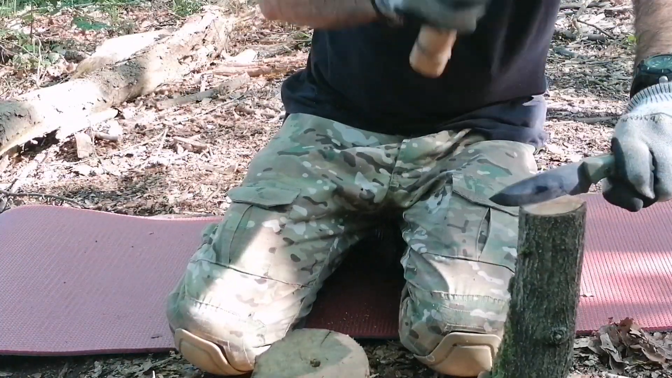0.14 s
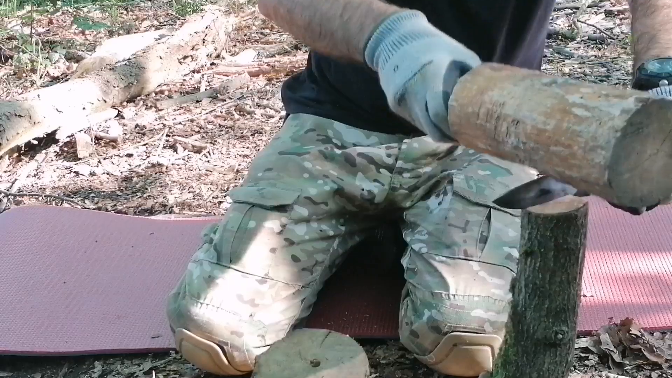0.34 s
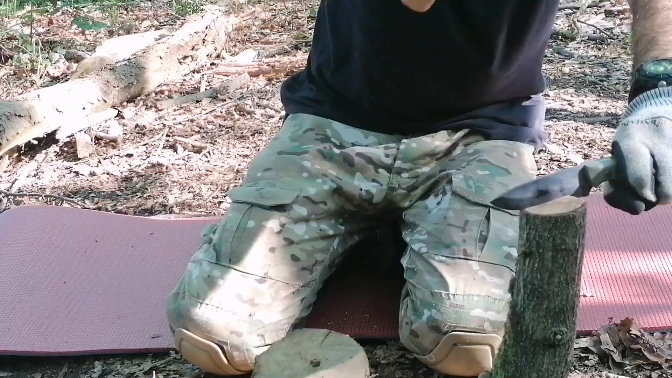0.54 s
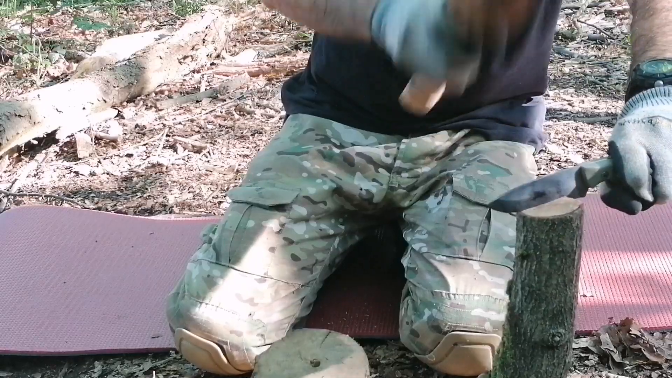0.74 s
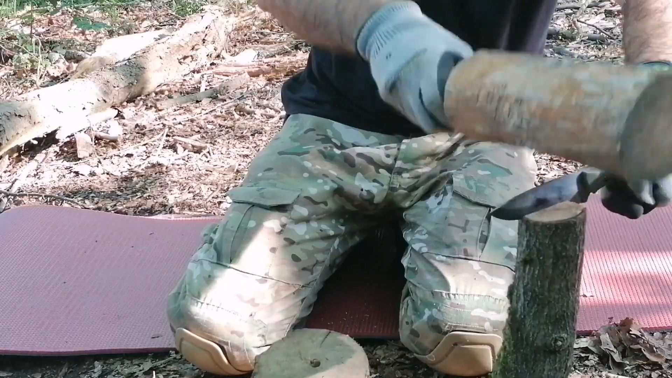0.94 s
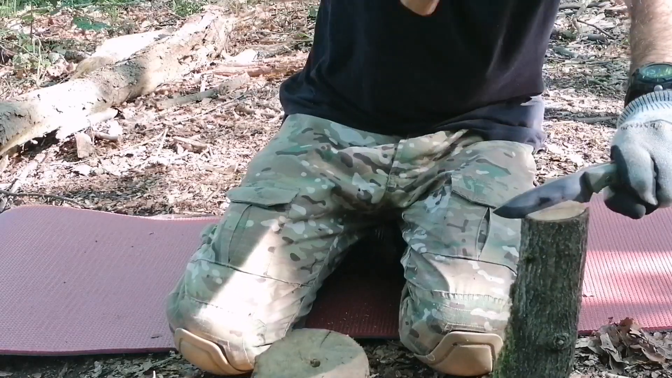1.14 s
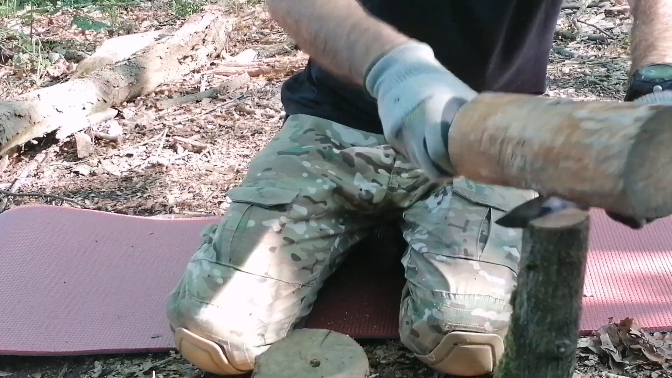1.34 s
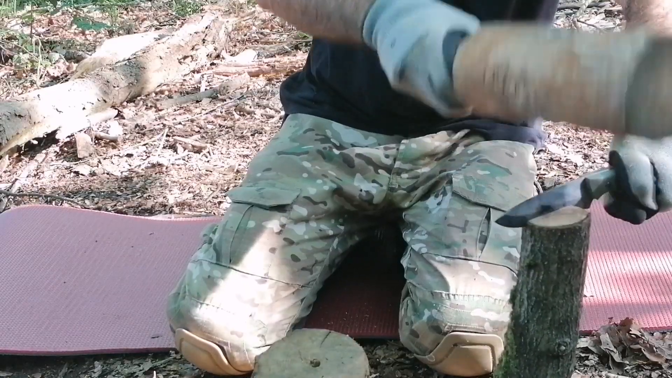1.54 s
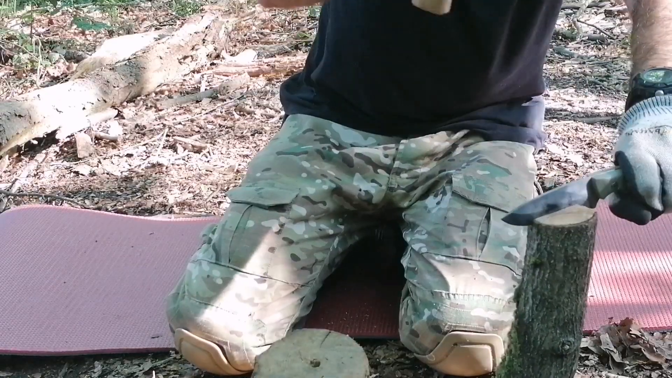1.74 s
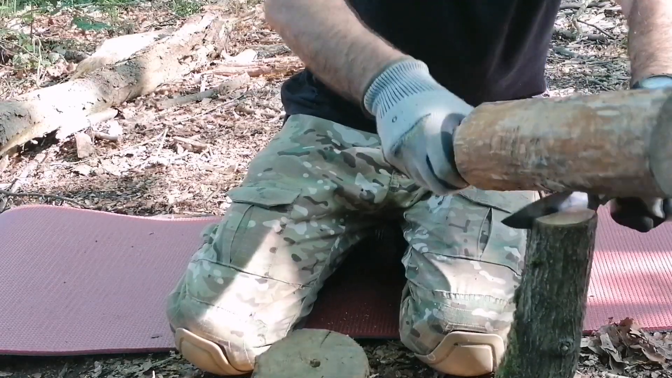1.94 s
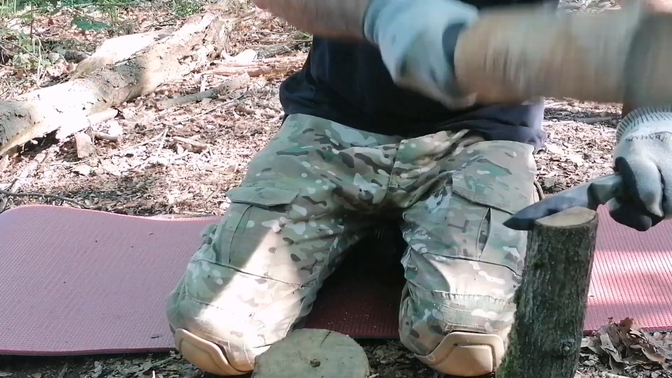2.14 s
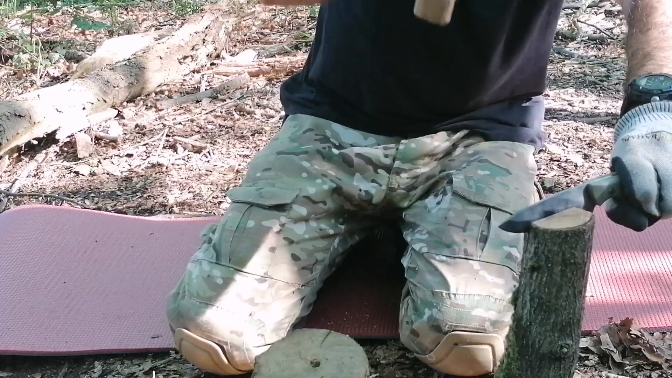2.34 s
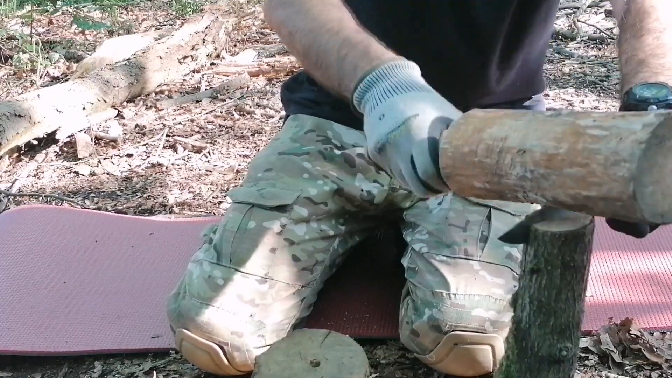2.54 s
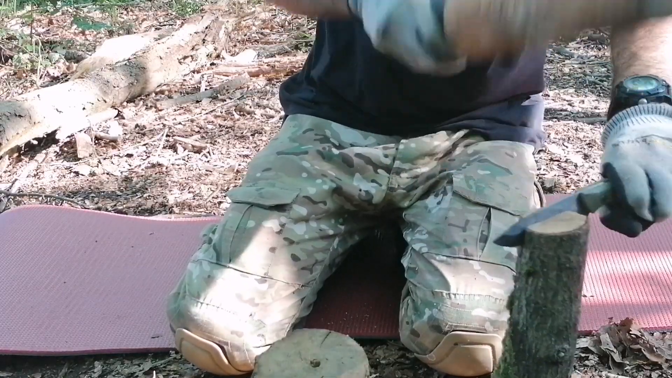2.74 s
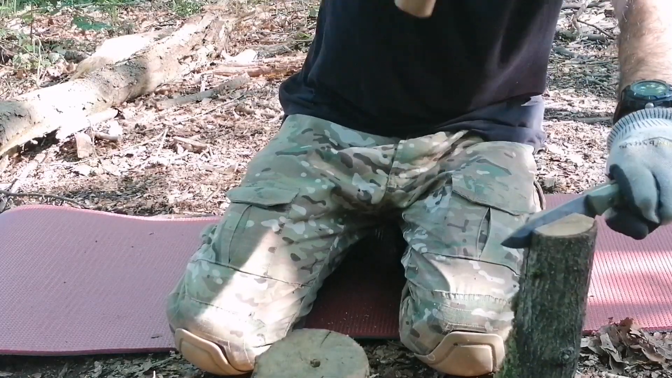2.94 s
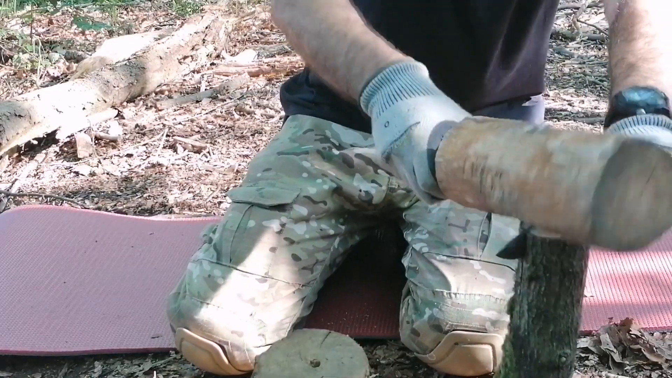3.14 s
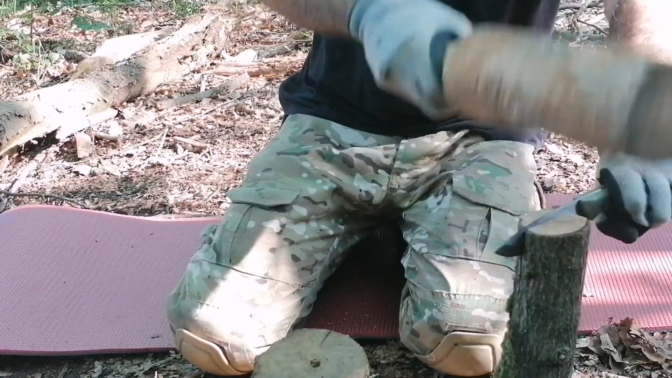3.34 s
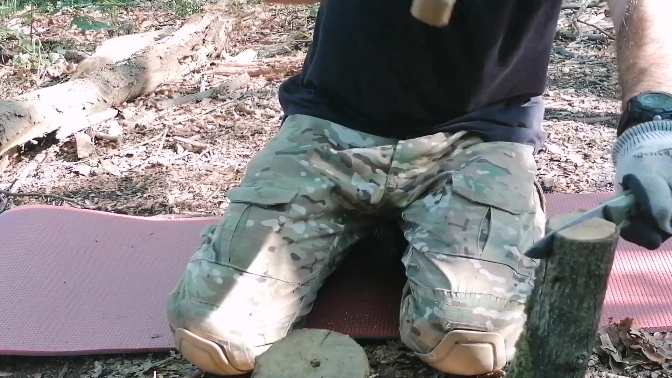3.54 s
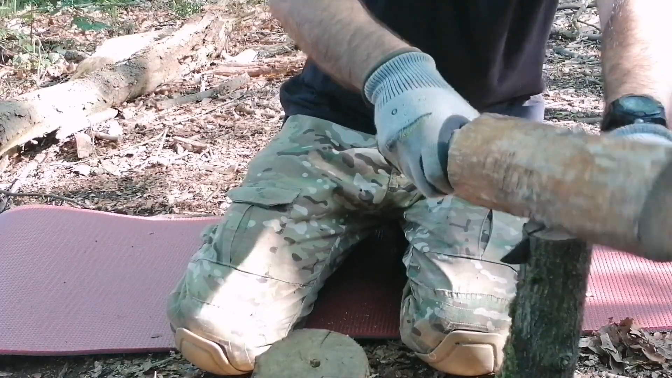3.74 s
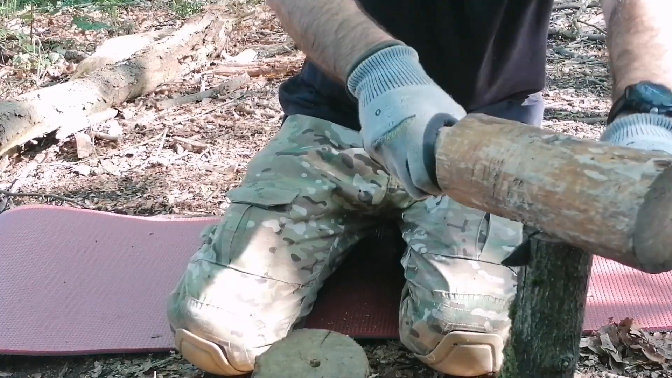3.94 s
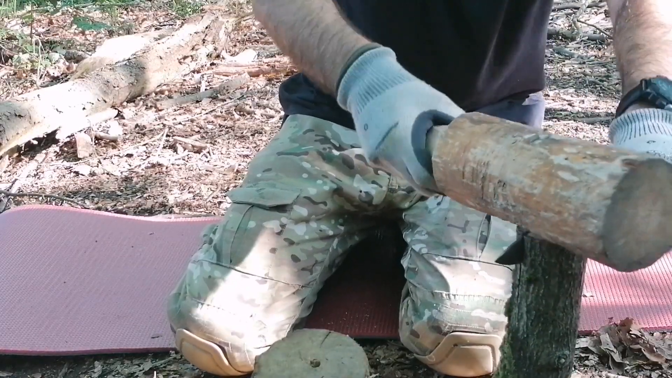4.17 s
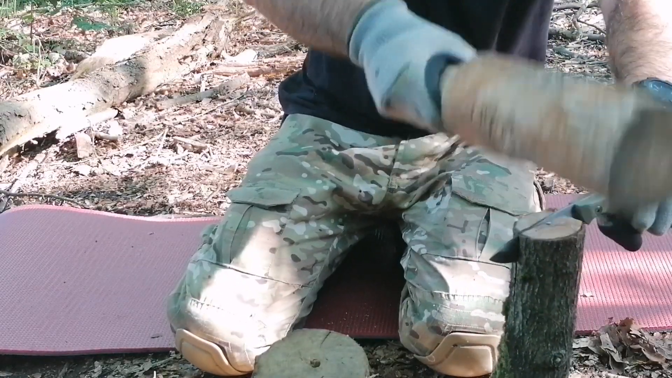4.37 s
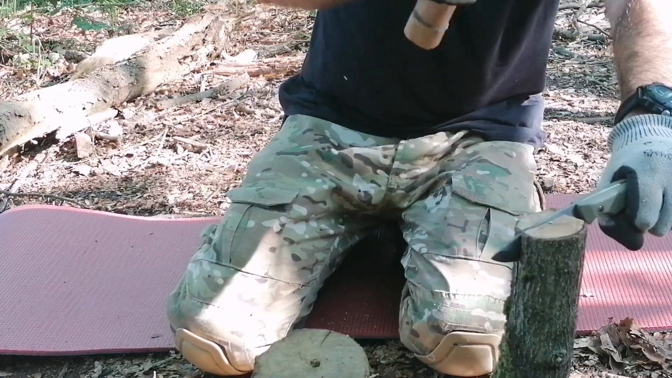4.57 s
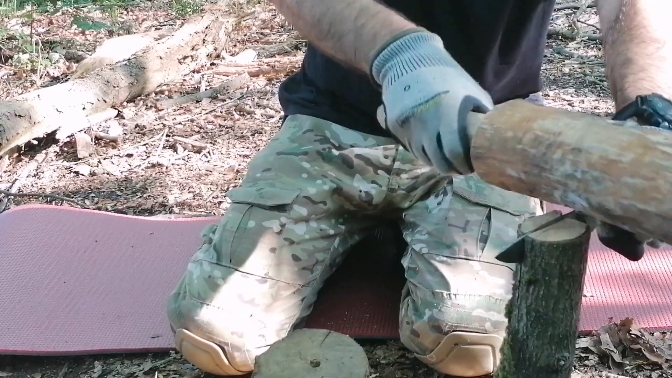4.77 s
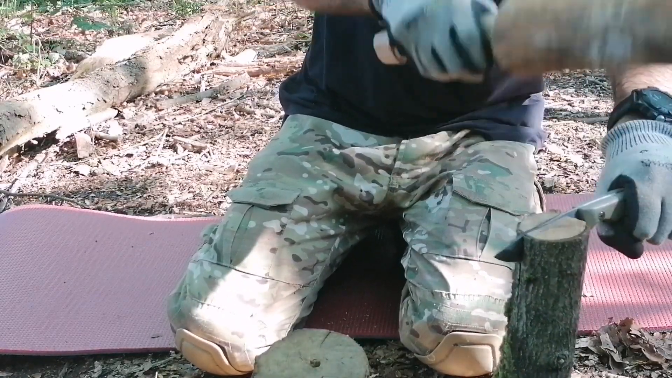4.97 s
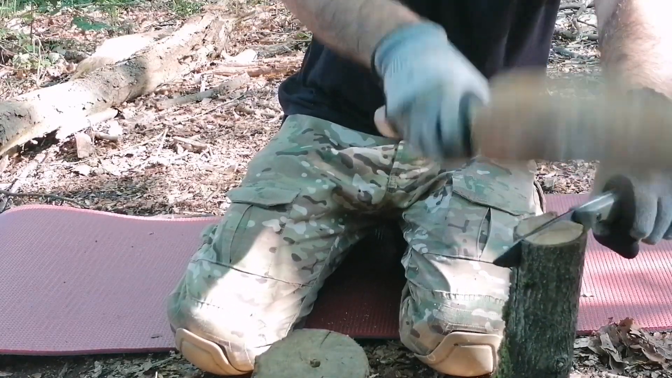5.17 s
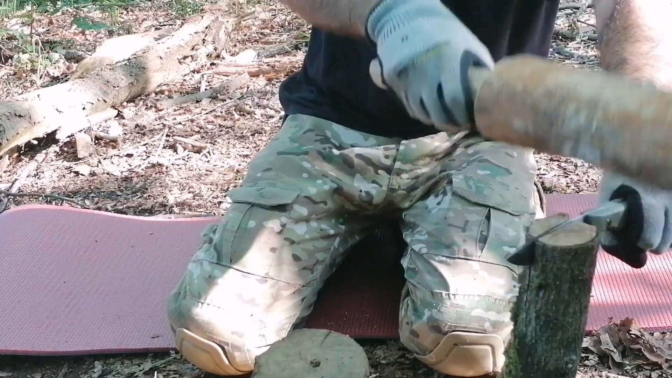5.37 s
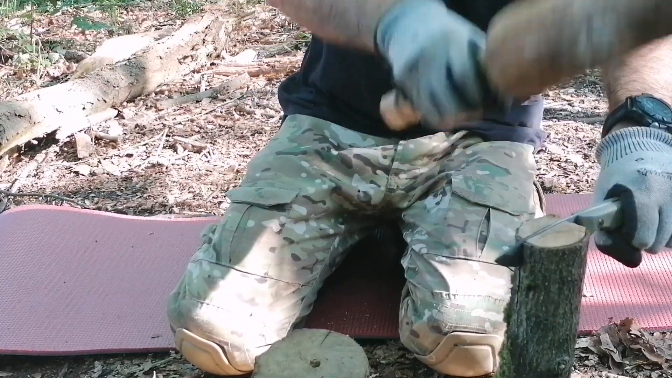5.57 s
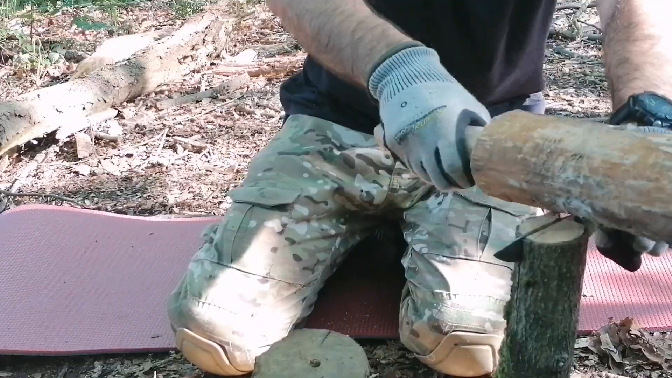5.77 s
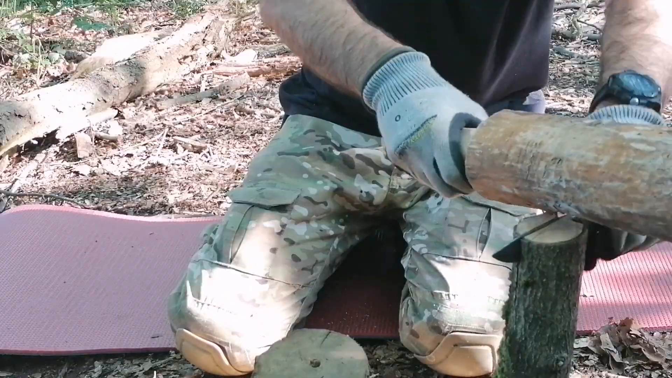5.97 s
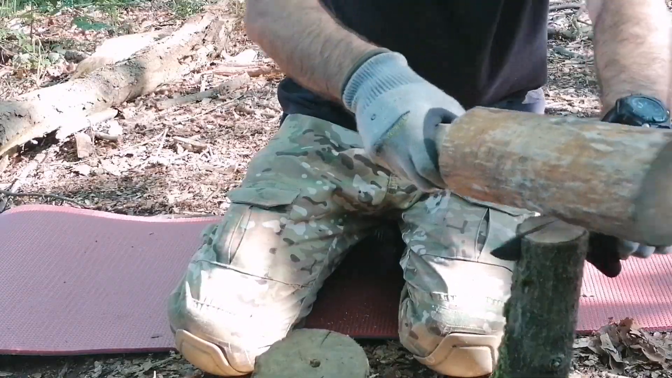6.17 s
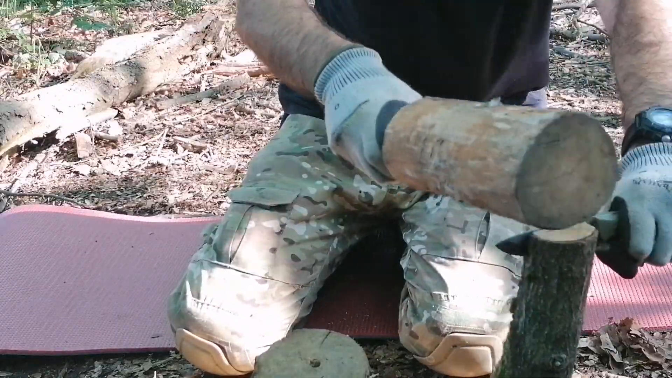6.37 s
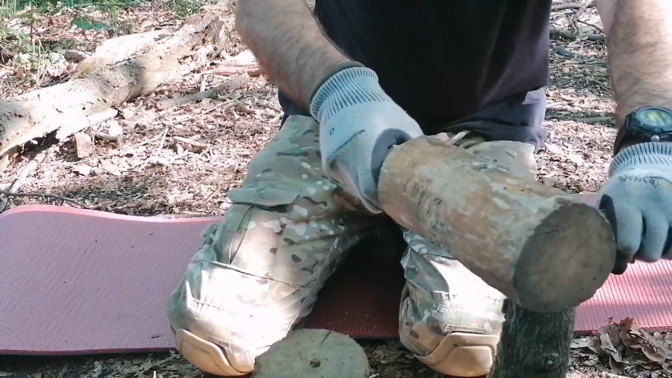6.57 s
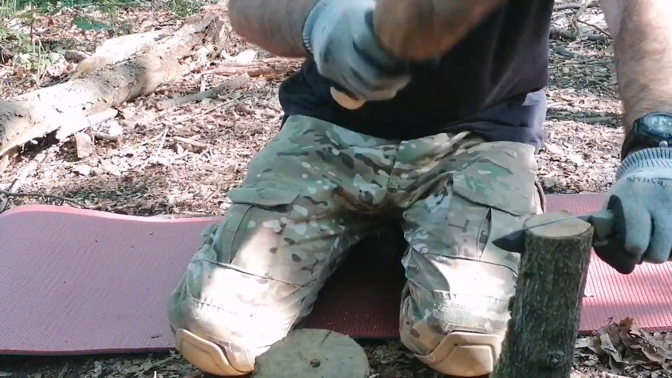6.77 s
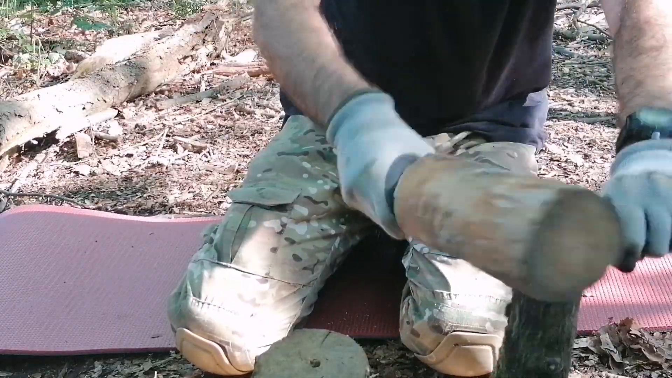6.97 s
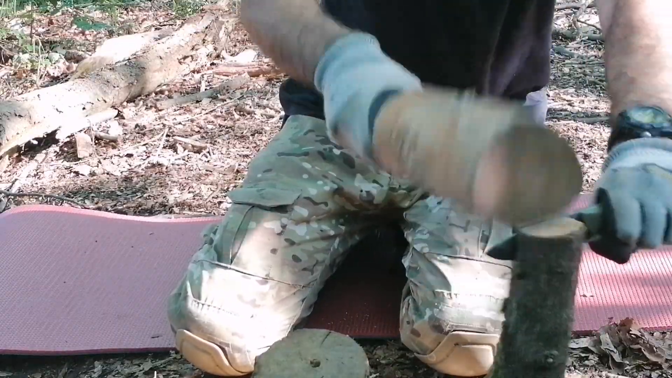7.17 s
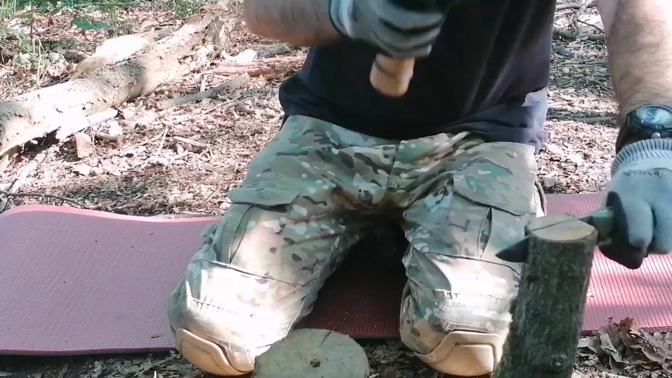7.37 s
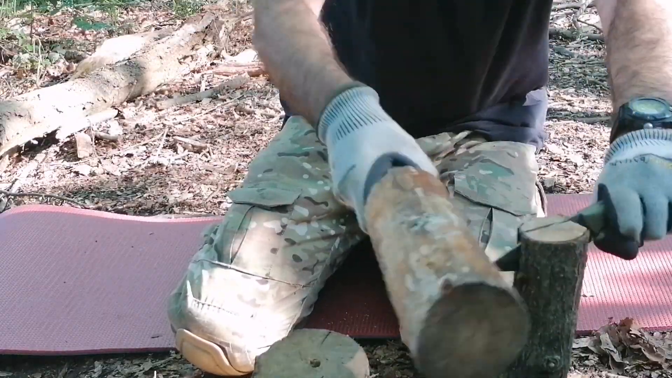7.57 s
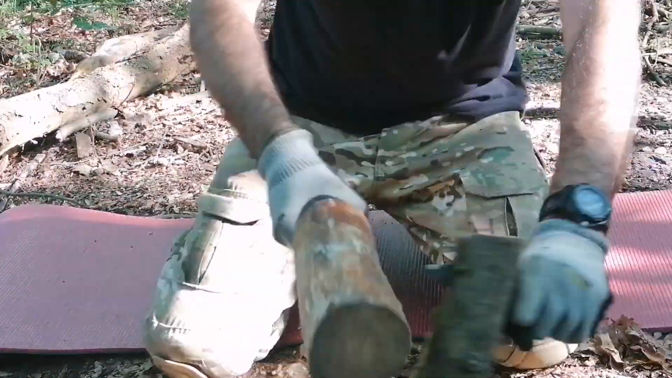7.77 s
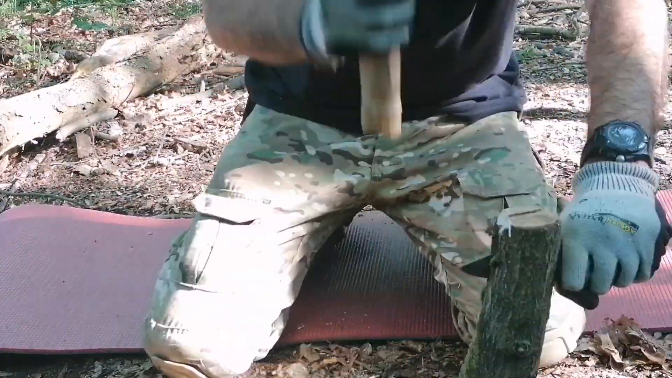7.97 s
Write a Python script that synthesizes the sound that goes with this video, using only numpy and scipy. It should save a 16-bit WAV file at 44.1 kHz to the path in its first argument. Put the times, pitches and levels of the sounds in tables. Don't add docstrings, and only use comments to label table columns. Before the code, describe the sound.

Sharp, dry wood-on-steel knocks about every half second, close up outdoors, echoing briefly off trees while faint birds whistle over a soft breeze.

```python
import sys
import numpy as np
from scipy import signal
from scipy.fft import rfft, irfft, next_fast_len
from scipy.io import wavfile
from scipy.ndimage import uniform_filter1d, map_coordinates

SR = 44100
rng = np.random.default_rng(int(sys.argv[2]) if len(sys.argv) > 2 else 0)


def invert_db(x):
    u = np.asarray(x, float) / 20
    return 10 ** u


def unload_wav(signal):
    wavfile.write(
        sys.argv[1],
        SR,
        np.round(np.clip(np.atleast_2d(signal).T, -1, 1) * 32767).astype(np.int16),
    )


N = 353240
BLOW = SR // 2
TURN_S = 7.6


def unit(x):
    return x / np.sqrt(np.mean(x ** 2) + 1e-20)


def along(points, hz):
    f, v = np.transpose(points)
    return np.interp(np.log(hz + 1), np.log(f + 1), v)


def curves(rows):
    s, *cols = np.transpose(rows)
    return [np.interp(np.arange(N) / SR, s, c) for c in cols]


def wobble(rate_hz, count):
    knots = rng.standard_normal(int(count * 40 / SR) + 500)
    return map_coordinates(knots, [np.arange(count) * rate_hz / SR])


def filtered(x, response):
    m = next_fast_len(x.shape[-1] + 2048)
    return irfft(rfft(x, m) * response(np.fft.rfftfreq(m, 1 / SR)), m)[..., :x.shape[-1]]


def resonance(centre_hz, width_hz):
    return lambda hz: 1j * hz * width_hz / (centre_hz ** 2 - hz ** 2 + 1j * hz * width_hz)


def ring(t, hz, t60, attack, phase=0):
    return np.sin(2 * np.pi * hz * t + phase) * invert_db(-60 * t / t60) * (1 - np.exp(-t / attack))


# start_s, drop_db, fade_t60_s
SCENE_CHANGES = [
    (7.6131, -38, .03),
    (7.6221, -19, .03),
    (7.781, 0, .019),
]


def add(track, s, sound, pan_db, lag=0):
    at = round(s * SR)
    left, right = sound * np.ones((2, 1)) * invert_db([[pan_db / 2], [-pan_db / 2]])
    chop = 1
    cuts = [row for row in SCENE_CHANGES if 0 < row[0] - s < .016]
    if cuts:
        cut, drop_db, t60 = cuts[0]
        past = s - cut + np.arange(len(left)) / SR
        chop = invert_db(np.clip(past / .0002, 0, 1) * (drop_db - 60 * past / t60))
    track[0, at + lag:][:len(left)] += left * chop
    track[1, at:][:len(right)] += right * chop


# start_s, level_db
BREEZE = [(0.0, -60.5), (0.56, -60), (1.89, -62), (2.0, -62.5), (3.08, -65), (3.23, -64.5), (3.68, -69),
          (4.03, -66), (4.14, -66.5), (4.39, -67.5), (4.99, -68), (6.64, -67.5), (7.64, -67.5), (8.0, -62)]
# pitch_hz, level_db
RUMBLE = [(12, -46), (20, -20.5), (59, 0.5), (86, 0), (130, 0), (195, -8), (400, -30), (770, -120)]
LEAVES = [(120, -39), (200, -2), (500, -2), (894, -1.5), (1100, -7), (3500, -22), (4550, -53), (7700, -120)]
HISS = [(1470, -30.5), (2500, -2.5), (4300, -5), (6200, -7), (7680, -6), (10200, -17), (15500, -23),
        (16300, -30)]
# pitch_hz, correlation (0 to 1)
ALIKE = [(30, 0.95), (200, .7), (800, 0.17), (3000, 0.61), (12000, 0.74)]


def rush(spectrum, patchy_db):
    z = signal.stft(rng.standard_normal((2, N)), nperseg=512)[2]
    field = uniform_filter1d(rng.standard_normal(z.shape[1:]), size=6, axis=0)
    field = uniform_filter1d(field, size=14, axis=1)
    pair = signal.istft(z * invert_db(patchy_db * unit(field)), nperseg=512)[1][:, :N]

    def mid_and_side(hz):
        turn = np.arccos(np.clip(along(ALIKE, hz), -1, 1)) / 2
        return invert_db(along(spectrum, hz)) * [np.cos(turn), np.sin(turn)]

    mid, side = filtered(pair, mid_and_side)
    return np.array([mid + side, mid - side]) / np.std(mid)


def woods():
    breeze_db, = curves(BREEZE)
    gust_db = breeze_db - breeze_db.mean()
    rumble_db = -65.5 + 0.94 * gust_db + 1.5 * wobble(6, count=N)
    leaves_db = -68 + 0.7 * gust_db + 1.5 * wobble(9.5, count=N)
    hiss_db = -79.5 + 0.81 * gust_db + 0.68 * wobble(5.6, count=N)
    rumble = invert_db(rumble_db) * rush(RUMBLE, patchy_db=0.5)
    leaves = invert_db(leaves_db) * rush(LEAVES, patchy_db=-1.3)
    return rumble + leaves + invert_db(hiss_db) * rush(HISS, patchy_db=1)


# pitch_hz, t60_s
TREES = [(100, 0.79), (500, 0.32), (1200, 0.53), (3000, 0.72), (8000, 0.28), (15000, .35)]
# pitch_hz, level_db
TREES_DB = [(100, -35.5), (300, -22), (650, -20.5), (1200, -22), (3000, -24.5), (8000, -15), (15000, -15.5)]


def scatter(sound, keep=BLOW):
    hz, t, z = signal.stft(rng.standard_normal((2, BLOW)), SR, nperseg=256)
    t60 = along(TREES, hz)[:, None]
    early = invert_db(7.0 - 60 * t / 0.066)
    patches = uniform_filter1d(rng.standard_normal(z.shape[1:]), size=7, axis=0)
    patches = uniform_filter1d(patches, size=16, axis=1)
    strength = invert_db(along(TREES_DB, hz)[:, None] + 1.2 * unit(patches))
    tail = signal.istft(z * strength * (invert_db(-60 * t / t60) + early), SR, nperseg=256)[1]
    onset = 1 - np.exp(-np.arange(tail.shape[1]) / SR / 0.002)
    return signal.fftconvolve(sound[None], tail * onset / 40, axes=1)[:, :keep]


# start_s, length_s, start_pitch_hz, end_pitch_hz, level_db
SLURS = [(2.2, 0.31, 2120, 2250, -78.5), (2.937, 0.13, 2450, 2820, -77), (3.04, .13, 2770, 2910, -72.5),
         (5.14, .09, 3420, 3260, -74), (3.164, 0.18, 2830, 2310, -65.5), (3.58, 0.11, 2030, 2380, -80),
         (3.67, 0.1, 2340, 2478, -81), (3.898, 0.066, 2500, 2706, -65.5), (3.889, 0.026, 2980, 2580, -63.5),
         (4.004, 0.057, 3124, 3024, -67), (4.065, 0.027, 3097, 2754, -72.5), (4.077, 0.04, 2615, 2705, -64),
         (4.121, 0.065, 2427, 2800, -62.5), (4.178, 0.0577, 2780, 2480, -62),
         (4.216, 0.052, 2544, 2530, -66), (4.294, 0.06, 2740, 2733, -79), (4.442, 0.018, 3080, 2780, -70),
         (4.574, 0.18, 2010, 1970, -82.5), (4.804, 0.044, 2287, 2780, -69.5), (4.9, 0.057, 2945, 2780, -68)]
# start_s, length_s, pitch_hz, level_db
HELD = [(.18, 0.098, 8860, -85), (6.4, 0.094, 8300, -76), (6.48, 0.088, 8420, -96),
        (1.42, 0.044, 2605, -75), (4.04, 0.1, 3075, -76), (6.03, .07, 3140, -82), (.6, 0.12, 3325, -70.5),
        (.775, .14, 3875, -74), (.39, 0.077, 2330, -67.5), (.38, 0.099, 2150, -68.5),
        (2.7, 0.25, 2670, -77), (.81, 0.11, 3720, -74), (1.366, 0.073, 2675, -64.5),
        (1.55, 0.22, 2550, -76), (1.71, 0.14, 2550, -79.5), (1.85, 0.083, 1905, -79.5),
        (1.9, 0.35, 2904, -72), (1.98, 0.11, 2650, -64), (2.586, 0.036, 2717, -64), (2.89, 0.14, 1900, -76),
        (3, 0.16, 2342, -80), (3.42, 0.35, 2570, -76), (5.37, 0.076, 3620, -78.5),
        (3.335, .08, 2710, -68.5), (3.37, 0.058, 2550, -68.5), (3.923, 0.024, 3100, -65.5),
        (4.54, 0.096, 3327, -67), (4.58, 0.25, 3260, -81), (4.7, .15, 2820, -77.5), (4.67, .065, 2825, -69),
        (5.01, 0.082, 2670, -65.5), (5.07, 0.21, 2633, -72.5), (5.2, 0.1, 2500, -73.5),
        (5.21, 0.12, 3250, -75), (7.8, .058, 3030, -78), (7.894, 0.029, 2950, -63),
        (7.92, 0.017, 2770, -68)]
# start_s, length_s, pitch_hz, level_db
CHATTER = [(.393, 0.13, 2290, -67), (.787, 0.075, 3910, -79), (2.33, 0.16, 3860, -73.5),
           (3.38, 0.12, 2570, -73), (3.447, 0.083, 4640, -76), (3.876, 0.36, 2827, -70),
           (4.25, 0.28, 2620, -82), (4.455, .11, 2645, -68.5), (4.58, 0.19, 2630, -75),
           (4.883, 0.16, 2750, -88), (5.17, 0.13, 2620, -69.5)]
# start_s, length_s, pitch_hz, level_db
SEEPS = [(1.34, 0.15, 7300, -75.5), (1.39, .1, 8000, -79.5), (1.62, 0.22, 6560, -82),
         (1.6, 0.22, 7300, -81.5), (2.36, .08, 8050, -85.5), (4.249, 0.094, 8170, -69.5),
         (4.67, 0.098, 7756, -86.5), (5.17, .08, 8040, -88), (6.39, 0.1, 8430, -84.5)]


def birds():
    track, count = np.zeros((2, N + SR)), 13000
    calls = [(*row, 30, False) for row in SLURS]
    voices = [(HELD, 0.019, 34), (CHATTER, 0.027, 130.6), (SEEPS, 0.06, 170)]
    for rows, drop, blur_hz in voices:
        for s, length, hz, db in rows:
            calls.append((s, length, hz * (1 + drop), hz, db, blur_hz, True))
    for s, length, start_hz, end_hz, db, blur_hz, settles in calls:
        u = np.clip(np.arange(count) / SR / length, 0, 1)
        left_to_glide = np.exp(-u / 0.14) if settles else 1 - u
        glide_hz = end_hz + (start_hz - end_hz) * left_to_glide + blur_hz * wobble(420, count)
        shape = np.sin(np.pi * u) ** 0.72 * (u < 1) * invert_db(1.1 * wobble(81, count))
        whistle = invert_db(db + 3.0) * shape * np.sin(2 * np.pi * np.cumsum(glide_hz) / SR)
        add(track, s, whistle, rng.normal(0, 2), lag=int(rng.integers(0, 6)))
    return track[:, :N] + invert_db(18) * scatter(track.mean(axis=0), keep=N)


# start_s, trees_db, thump_db, standing_ring_db, splinter_brightness_db
CARRY = [(.36, -1.5, 3, 1.5, 8), (.92, 1.7, 0.5, -0.2, 4), (1.48, 2, -2.5, 0, 1),
         (2.05, 3.5, -1, -0.7, 6.5), (2.62, 2, 0, -4, 1.5), (3.21, 2, -2, -6, -0.3),
         (3.82, 3, -0.5, -1.8, -6), (4.85, 1, 2.5, -0.1, 0.7), (5.34, -1, 1, 1.2, 3.2),
         (5.78, 1.5, -1.5, -0.5, 4.9), (6.61, -1.5, 0.5, 4, 0), (7.1, -1, 4.5, 1, 3.5),
         (7.61, 1.5, -0.9, -1.4, 1.5), (7.77, -6, -1.5, 0, -2.2), (8, -1, -1.5, 2.5, -2)]


def carry(s):
    at, *cols = np.transpose(CARRY)
    return [c[np.argmin(abs(at - s))] for c in cols]


# start_s (crest), level_db, pitch_hz, length_ms, ring_db
KNOCKS = [(0.3641, -4, 547, 2.03, 2.5), (0.9231, -2.5, 558, 2.16, -1), (1.4856, -2.5, 586, 1.6, -5),
          (2.0523, -2.5, 660, 1.35, -3.5), (2.6248, -5, 631, 2.3, 1), (3.2173, -5, 791, 1.87, -3),
          (3.8218, -6, 710, 1.32, -1), (4.8533, -9.5, 633.7, 1.74, 4.5), (5.3409, -10.5, 646, 1.72, 2),
          (5.7791, -9, 641, 1.6, 2), (6.6119, -36.5, 419.2, 4.37, -14.5), (7.106, -13, 714, 1.27, -0.5),
          (7.6132, -11.5, 613, 1.6, 7.5), (7.6225, -11, 775, 0.88, 4.5), (7.7713, -9, 497, 2.7, -5),
          (7.833, -46, 543, 3.2, 3.5), (8.0015, -7, 513, 3, -9.5)]
# start_s, pitch_hz
LOG = [(.36, 933), (.92, 799), (3.2, 792), (3.82, 786), (4.85, 818), (5.34, 817), (5.78, 812), (7.1, 800)]
# pitch_hz, level_db, t60_s
BATON = [(352, -3, 0.016), (556, -14, 0.065)]
# pitch_hz, level_db, t60_s
STANDING = [(298.5, -18.5, 0.058), (344, -16.5, .04), (446, -27.5, 0.076), (710, -29.5, 0.051),
            (922, -25, 0.052), (995, -27, .06)]
# delay_s, level_db
ECHOES = [(.00175, -18.5), (.0041, -15), (.0099, -20), (0.018, -20), (.027, -32), (.046, -33)]


def wood():
    track, t = np.zeros((2, N + SR)), np.arange(BLOW) / SR
    crest_s = .003
    since = t - crest_s
    for s, db, jolt_hz, length_ms, ring_db in KNOCKS:
        turned = s > TURN_S
        trees_db, thump_db, standing_db, bright_db = carry(s)

        length = length_ms / 1000
        swell = np.exp(-((since - 0.63 * (length - .0008)) / (0.5 * length)) ** 2)
        sag = since - 55 * since ** 2
        jolt = swell * np.cos(2 * np.pi * jolt_hz * sag) * (since < .008)
        echoes = 0
        for delay, level in ECHOES:
            echoes = echoes + invert_db(level + rng.normal(0, 1.5)) * np.roll(jolt, round(delay * SR))

        log_hz = np.interp(s, *np.transpose(LOG))
        modes = invert_db(-11.5) * np.cos(2 * np.pi * log_hz * since) * invert_db(-60 * t / 0.07)
        for hz, level, t60 in BATON:
            chance = rng.standard_normal() * invert_db(3)
            modes += invert_db(level + chance) * np.cos(2 * np.pi * hz * since) * invert_db(-60 * t / t60)
        modes *= 1 - np.exp(-(t / 0.0012) ** 2)

        late = np.maximum(t - .006, 0)
        harder_db = turned * 16.5
        thump = invert_db(-38.5) * ring(late, 41, 0.33, 0.0044) + invert_db(-31) * ring(late, 91, 0.069, 0.0044)
        thump = invert_db(harder_db) * thump + invert_db(-26.0 - harder_db) * ring(t, 190, 0.046, 0.00086)

        sound = invert_db(db) * (invert_db(-1.0) * (jolt + echoes) + invert_db(ring_db - 2.0) * modes)
        sound *= -1 if turned else 1
        radiation = lambda hz: (1 - 1.7 * resonance(270, 170)(hz)) / (1 + (150 / (hz + 1)) ** 2)
        sound = filtered(sound, radiation)
        after = np.maximum(since - .0045, 0)
        standing = sum(invert_db(level) * ring(after, hz, t60, 0.0067) for hz, level, t60 in STANDING)
        sound += invert_db(db + standing_db) * standing
        sound -= invert_db(db + thump_db) * thump
        add(track, s - crest_s, sound, 2.5 if turned else -3.8, lag=3)
        add(track, s - crest_s, scatter(invert_db(db + 1.5) * jolt[:400]), -1.5)
    return track


# start_s, level_db, pitch_hz, splinter_db, bark_db
CLACKS = [(0.362, -17, 1830, -22, -3), (0.92, -14.5, 1950, -17, 7), (1.4829, -14.5, 2030, -15, 5.5),
          (2.05, -14, 2756, -15, 1), (2.6224, -11.5, 2643, -20, 0), (3.215, -19, 2990, -14, 8.5),
          (3.819, -23, 2057, -8.5, 3), (4.8506, -22.5, 2830, -16, -18), (5.3383, -23.5, 2433, -21.5, -2),
          (5.7774, -26.5, 2850, -17, -2), (6.6109, -35.5, 2910, -7, -32), (7.1035, -20.5, 2964, -16, -3),
          (7.6113, -24.5, 2200, -5, -11), (7.62, -28.5, 2130, -9.5, -11), (7.769, -16.5, 2650, -10.5, -1.5),
          (7.999, -28, 2500, -3, -4.5)]
# pitch_hz, level_db
SPLINTER = [(2060, -27.5), (3500, -4), (4700, -3.5), (6200, -7.5), (7700, -7), (10500, -13.5),
            (14900, -34.5), (16300, -43.5)]
# pitch_hz, level_db
RETURN = [(590, -30), (1000, 0.5), (1810, -6.5), (3550, -10.5), (3900, -18), (7730, -18.5), (14500, -39),
          (16300, -63.5)]


def steel():
    track, t = np.zeros((2, N + SR)), np.arange(BLOW // 4) / SR
    click = np.zeros(512)
    click[128] = 1
    for s, db, clack_hz, splinter_db, bark_db in CLACKS:
        trees_db, thump_db, standing_db, bright_db = carry(s)

        def clack_colour(hz):
            return resonance(clack_hz, 900)(hz) / (1 + (hz / 4000) ** 4) / (1 + (1200 / (hz + 1)) ** 6)

        def hiss_colour(hz):
            return invert_db(along(SPLINTER, hz) + along([(5500, 0.0042), (7500, bright_db)], hz))

        def bark_colour(hz):
            return resonance(1060, 380)(hz) ** 2

        def return_colour(hz):
            tilt = [(3000, 0.02), (6000, 0.52 * (splinter_db + 19.0))]
            return invert_db(along(RETURN, hz) + along(tilt, hz))

        apart = np.reshape([.5, 1.1, .7], (-1, 1, 1))
        burst = rng.standard_normal((3, 1, len(t))) + apart * rng.standard_normal((3, 2, len(t)))
        clack = unit(filtered(burst[0], clack_colour))
        hiss = unit(filtered(burst[1], hiss_colour))
        bark = unit(filtered(burst[2], bark_colour))

        clack *= invert_db(-0.5) * (invert_db(-60 * t / 0.0067) + invert_db(-16.0 - 60 * t / 0.047))
        clack *= 1 - np.exp(-t / 0.00066)
        square = np.clip((clack_hz - 2100) / 400, 0, 1)
        clack += square * ring(t, clack_hz, 0.013, 0.0007)
        hiss *= (invert_db(-60 * t / 0.02) + invert_db(-18.0 - 60 * t / 0.031)) * (1 - np.exp(-t / 0.00016))
        bark *= invert_db(-3 - 60 * t / 0.025) * (1 - np.exp(-(t / 0.0031) ** 2))
        direct = clack + invert_db(splinter_db + 2.0) * hiss + invert_db(bark_db) * bark
        add(track, s, invert_db(db + 4.0) * direct, 2 if s > TURN_S else -2.2, lag=3)

        scatter_db = -18 if s > TURN_S else 0.16 * (splinter_db + 16.5)
        smooth = unit(filtered(click, return_colour)) + 0.48 * unit(filtered(click, clack_colour))
        add(track, s, invert_db(db - 8.0 + scatter_db + trees_db) * scatter(smooth), -1.5)
    return track


# start_s, wood_pitch_hz, wood_level_db, blade_pitch_hz, blade_level_db
NOTES = [(0.3626, 1170, -13, 1744, -15.5), (0.9209, 1142, -6, 2560, -22), (1.483, 1105, -14, 2066, -27),
         (2.0505, 1077, -3.5, 1576, -18.5), (2.6228, 1018, -16.5, 1987, -15), (3.217, 1400, -20, 2090, -24),
         (3.8191, 1055, -7, 1593, -16.5), (4.851, 1537, -30.5, 2226, -34), (5.34, 1820, -24, 3300, -27.5),
         (5.779, 1193, -17.5, 1549, -23.5), (6.6111, 1730, -37, 3300, -45),
         (7.1039, 1030, -15.5, 3250, -22), (7.77, 979, -5.5, 1500, -22), (7.9982, 1134, -25, 2530, -28)]
# start_s, pitch_hz, level_db, pitch_hz, level_db
FURTHER_NOTES = [(.363, 2120, -16.5, 4880, -26.5), (0.9211, 2000, -15, 2750, -21),
                 (1.4835, 2660, -21, 3160, -20), (2.0505, 3980, -20, 1450, -19),
                 (2.623, 3180, -12, 2467, -18.5), (3.2155, 2780, -23, 1470, -15.5),
                 (3.82, 3160, -31, 2940, -26.5), (4.851, 1600, -27.5, 1400, -35),
                 (5.3381, 1430, -23.5, 2406, -22.5), (5.777, 2090, -32.5, 1405, -29),
                 (7.1042, 1960, -24.5, 1505, -28), (7.6123, 4400, -38, 3900, -24),
                 (7.7695, 810, -17, 4204, -22), (7.9997, 2500, -7.5, 2750, -25)]


def short_notes():
    track, t = np.zeros((2, N + SR)), np.arange(2000) / SR
    for s, wood_hz, wood_db, blade_hz, blade_db in NOTES:
        add(track, s, invert_db(wood_db) * ring(t, wood_hz, .011, .0011), 1.0, lag=3)
        add(track, s, invert_db(blade_db) * ring(t, blade_hz, .009, 0.00017), -2.2, lag=3)
    for s, first_hz, first_db, second_hz, second_db in FURTHER_NOTES:
        pair = invert_db(first_db) * ring(t, first_hz, 0.011, 0.0004)
        pair += invert_db(second_db) * ring(t, second_hz, 0.011, 0.0004)
        add(track, s, pair, -2.1, lag=3)
    return track


# start_s, level_db, pitch_hz (centre)
TICKS = [(.721, -66, 8950), (2.9746, -60, 7600), (4.0916, -65.5, 8560), (4.116, -66, 9000),
         (4.2105, -68, 4990), (4.3447, -61, 8200), (4.363, -57, 8950), (4.4406, -66, 7300),
         (6.194, -61.5, 5320), (6.2494, -67.5, 10030), (6.2642, -67, 9500), (6.3299, -75.5, 5830),
         (6.391, -61.5, 8260), (6.226, -70, 10500), (3.95, -60, 8000), (6.7387, -62.5, 7700),
         (7.2724, -60.5, 5800), (7.3576, -63.5, 5920), (7.71, -65.5, 7600)]
# start_s, level_db, pitch_hz (centre)
FURTHER_TICKS = [
    (5.3138, -43.5, 8983),
    (7.16, -46.5, 5837),
    (7.595, -55, 5960),
]


def ticks():
    track, t = np.zeros((2, N + SR)), np.arange(400) / SR
    for s, db, centre_hz in list(TICKS) + list(FURTHER_TICKS):
        snap = rng.standard_normal((2, len(t))) * invert_db(-60 * t / 0.0041)
        band = lambda hz: resonance(centre_hz, 5000)(hz) ** 2 / (1 + (hz / 13000) ** 6)
        add(track, s, invert_db(db + 12) * filtered(snap, band), -1.5)
    return track


# start_s, length_s, level_db, pitch_hz (centre)
RUSTLES = [(4.052, 0.24, -82.5, 5100), (4.424, 0.047, -74, 3004), (6.095, 0.15, -73.5, 2964),
           (6.121, 0.12, -77.5, 8000), (6.608, 0.023, -56, 1800), (6.609, 0.017, -47, 219.8),
           (6.61, .1, -72, 7000), (7.617, 0.033, -68, 2146), (7.828, 0.031, -56.5, 513),
           (4.439, 0.0087, -63.5, 3430), (7.9, 0.071, -68.5, 3160)]


def rustles():
    track, count = np.zeros((2, N + SR)), 9000
    for s, length, db, centre_hz in RUSTLES:
        u = np.clip(np.arange(count) / SR / length, 0, 1)
        grains = rng.standard_normal((2, count)) * invert_db(1.6 * wobble(189, count))
        band = lambda hz: resonance(centre_hz, 1.6 * centre_hz)(hz) ** 2 / (1 + (hz / 11000) ** 6)
        add(track, s, invert_db(db) * np.sin(np.pi * u ** 1.04) * unit(filtered(grains, band)), 0)
    return track


# start_s, level_db
WOODS_GATE = [(0, 0), (7.597, 0), (7.601, -10), (7.606, -10), (7.62, 0)]


def scene():
    background = (woods() + birds()) * invert_db(curves(WOODS_GATE)[0])
    near = wood() + steel() + short_notes() + ticks() + rustles()
    return near[:, :N] + background


def band_limit(x):
    return signal.sosfilt(signal.butter(12, 16480, fs=SR, output="sos"), x)


# pitch_hz, level_db
MICROPHONE = [(15450, 0), (15650, -12), (16400, -13), (16500, -70)]


def record(dry):
    top, knee = .9, 3
    rounded = dry / (1 + np.abs(dry / top) ** knee) ** (1 / knee)
    mix = filtered(rounded, lambda hz: invert_db(along(MICROPHONE, hz)))
    return band_limit(mix)


dry = scene()
out = record(dry)
unload_wav(out)
```